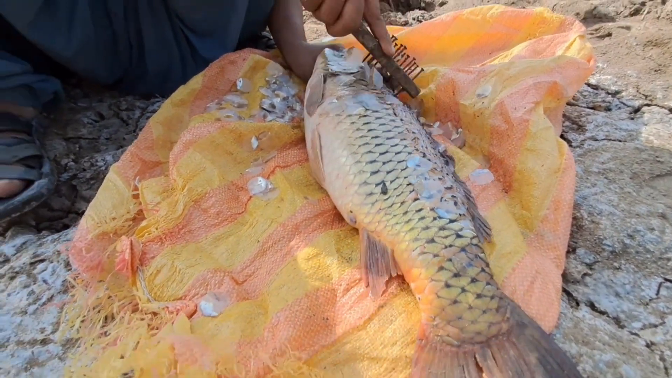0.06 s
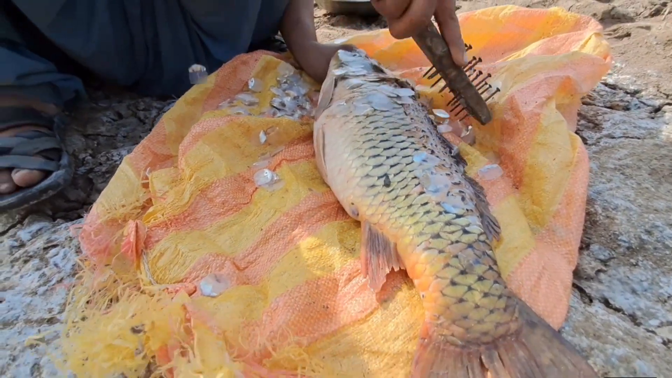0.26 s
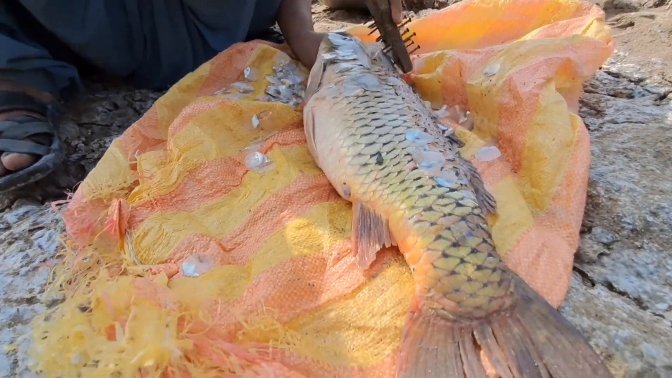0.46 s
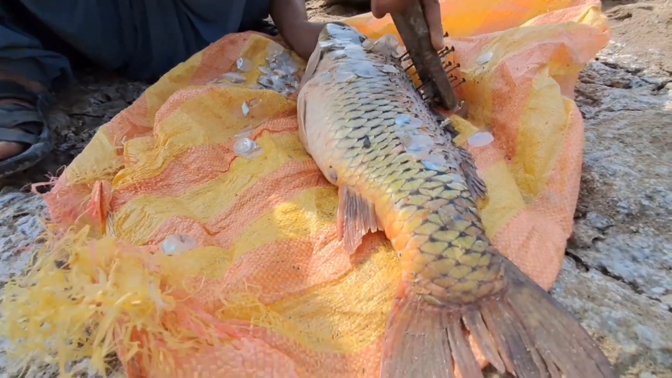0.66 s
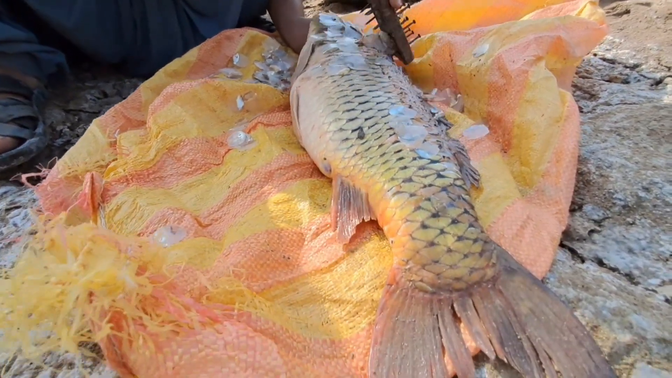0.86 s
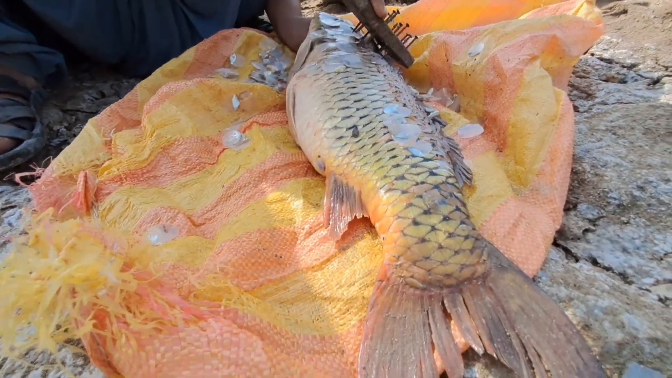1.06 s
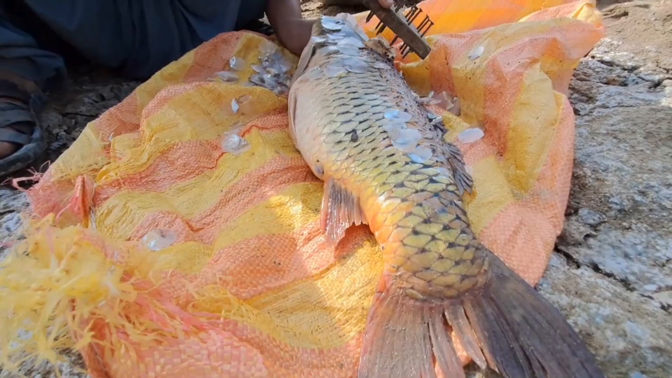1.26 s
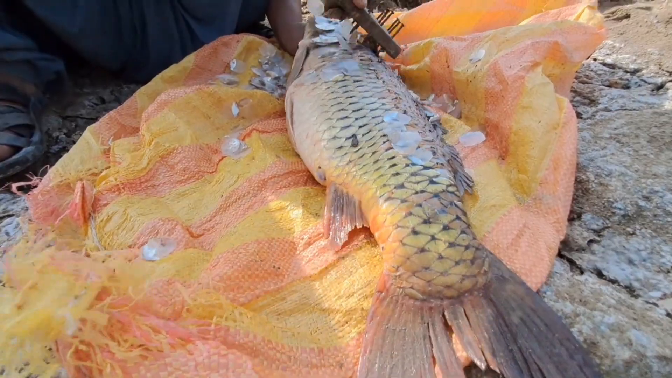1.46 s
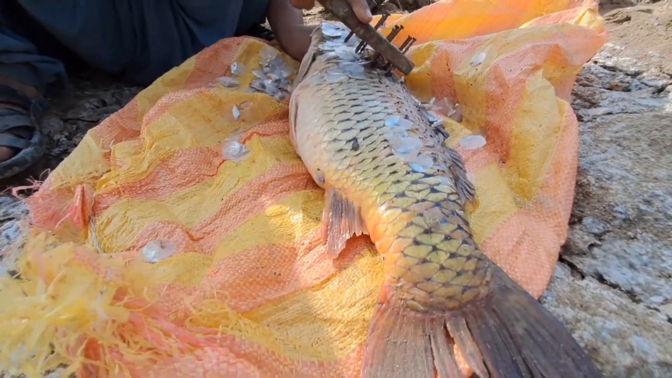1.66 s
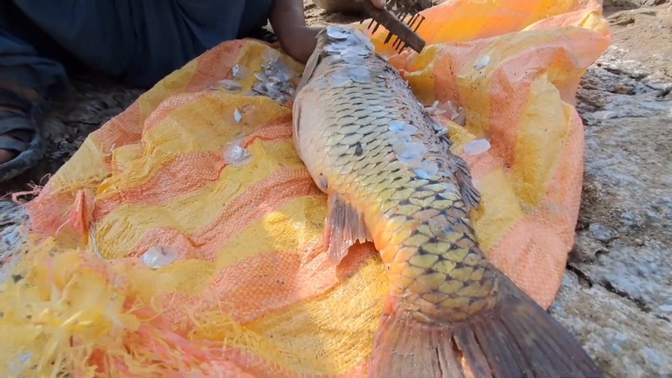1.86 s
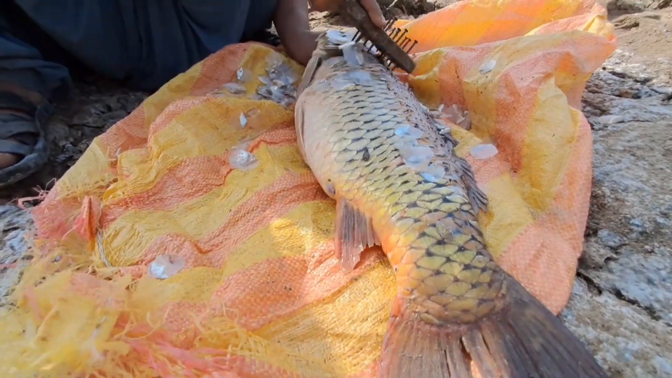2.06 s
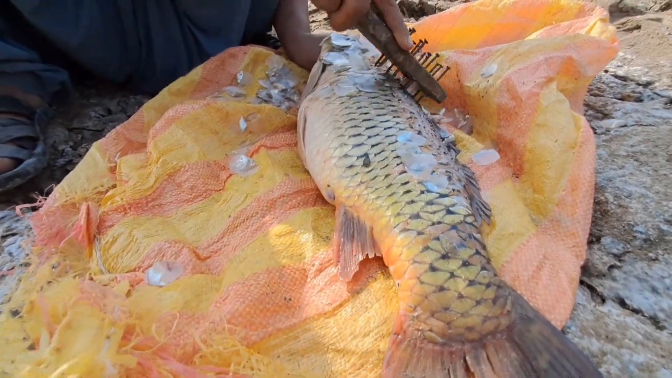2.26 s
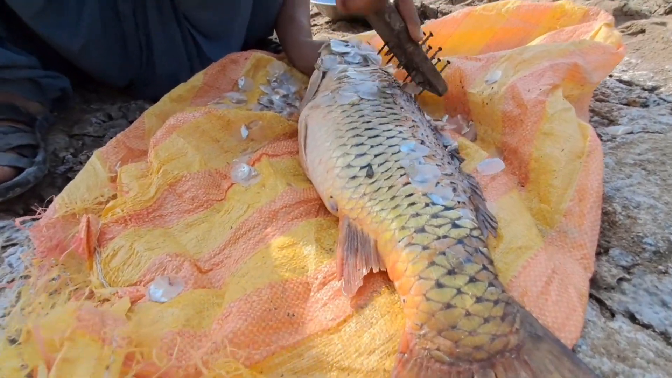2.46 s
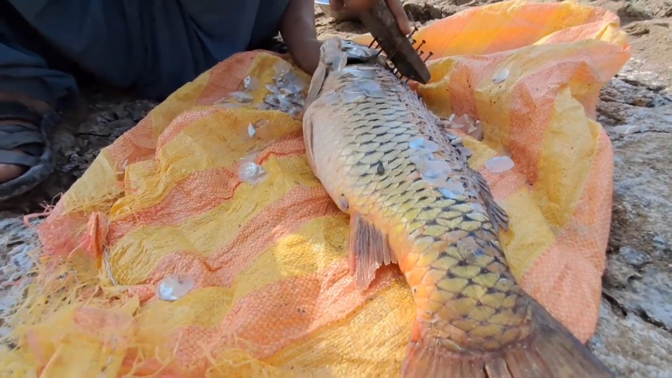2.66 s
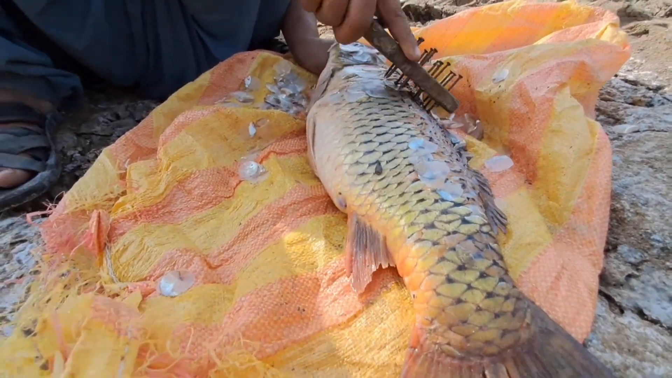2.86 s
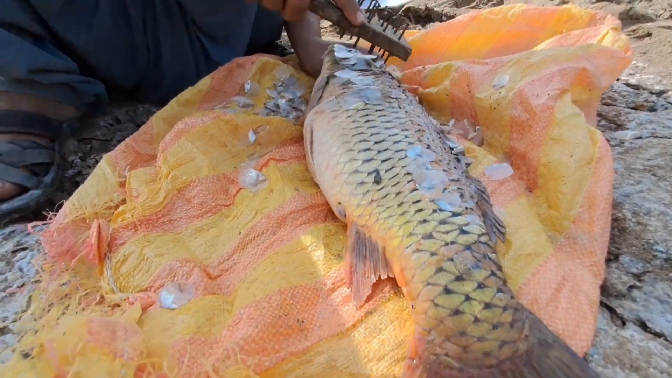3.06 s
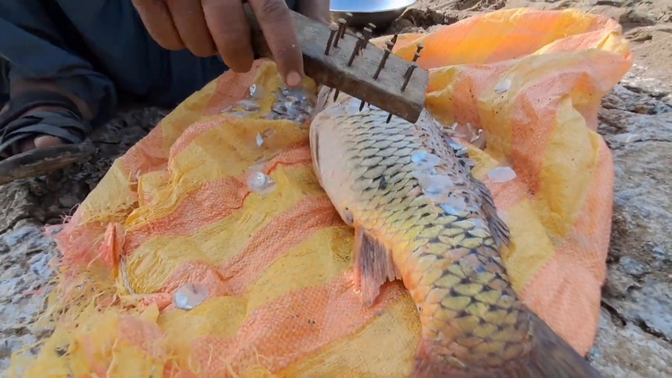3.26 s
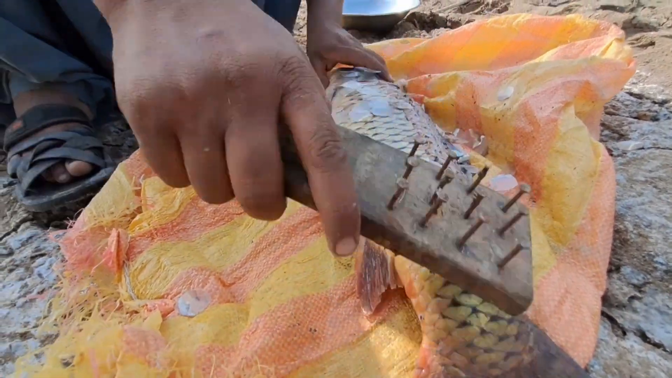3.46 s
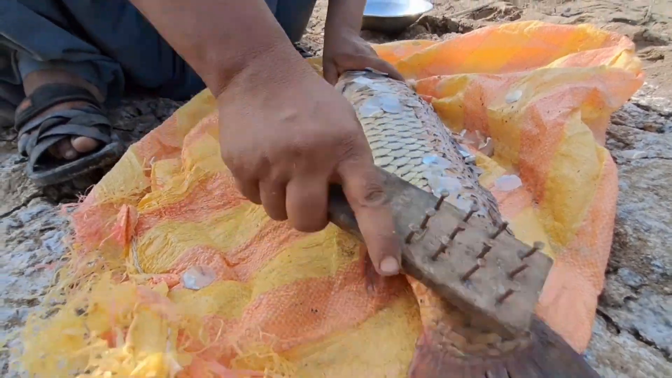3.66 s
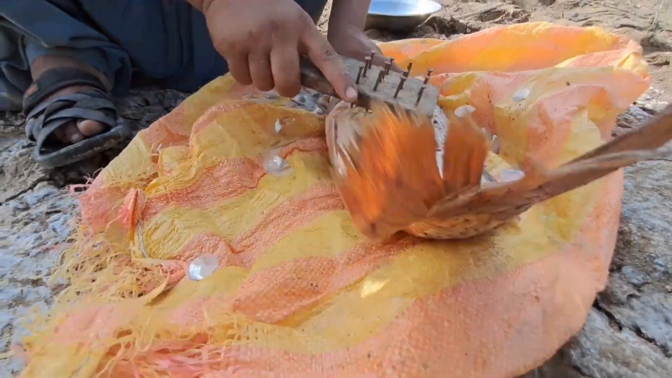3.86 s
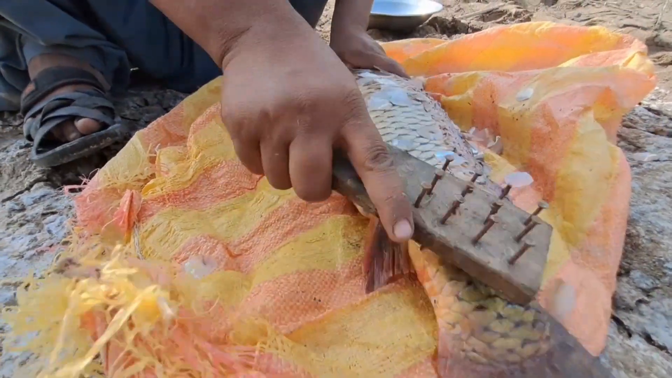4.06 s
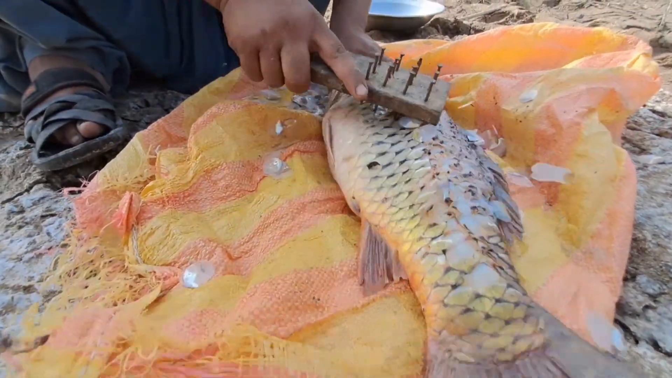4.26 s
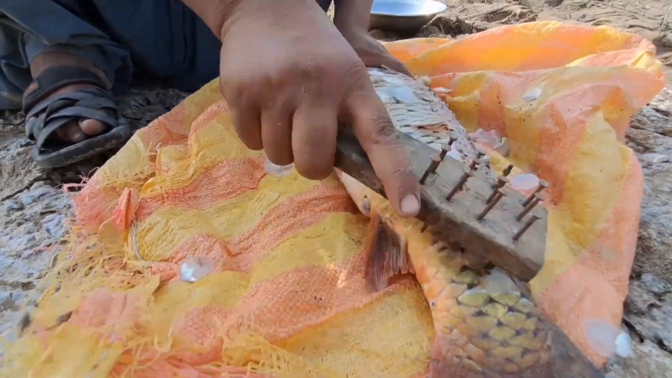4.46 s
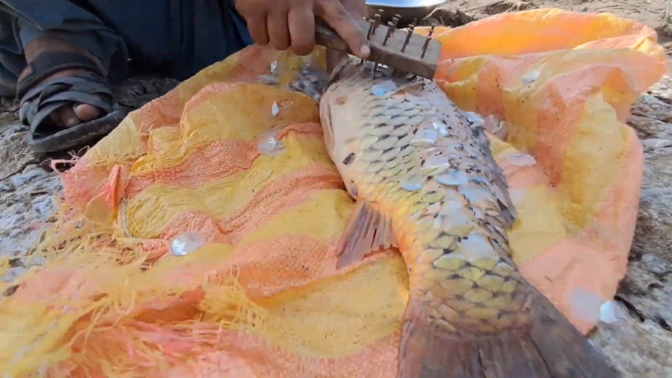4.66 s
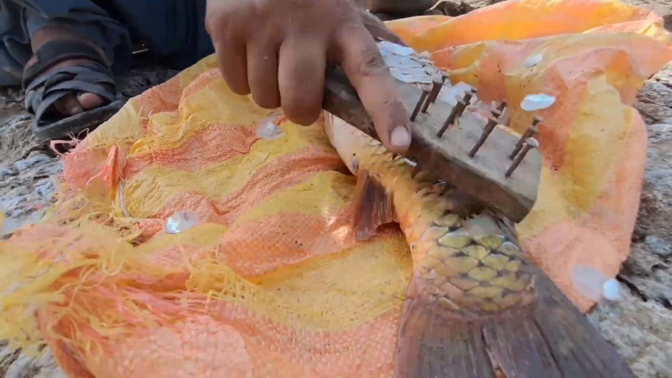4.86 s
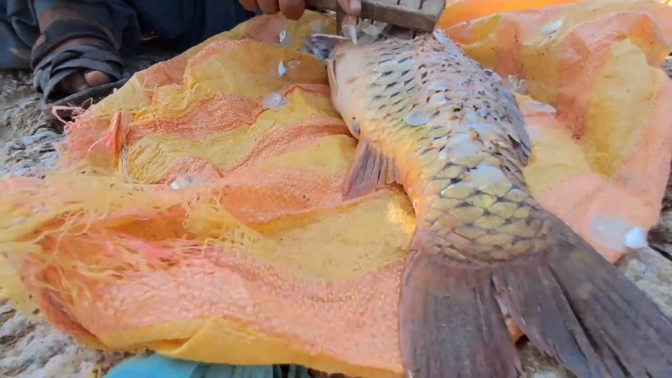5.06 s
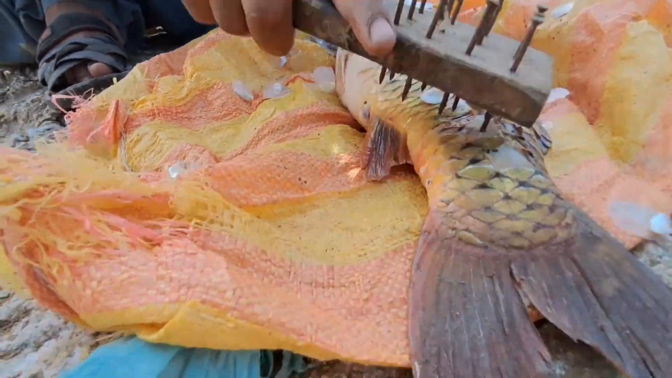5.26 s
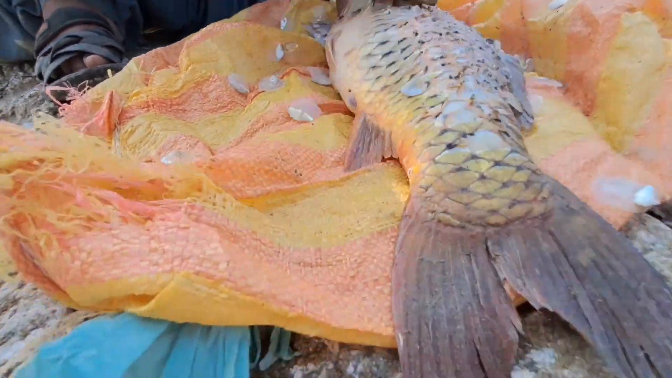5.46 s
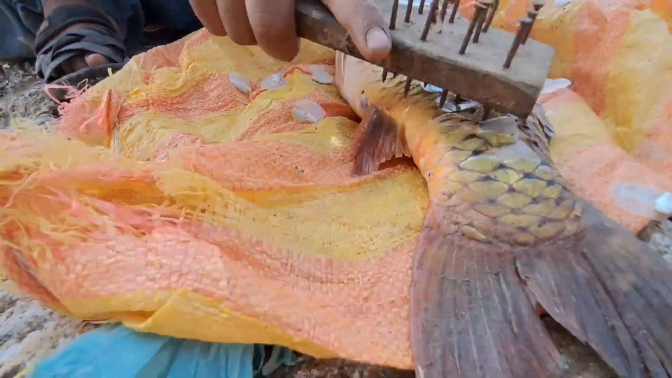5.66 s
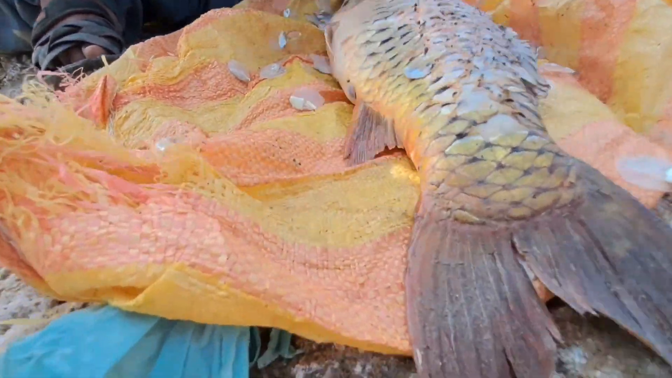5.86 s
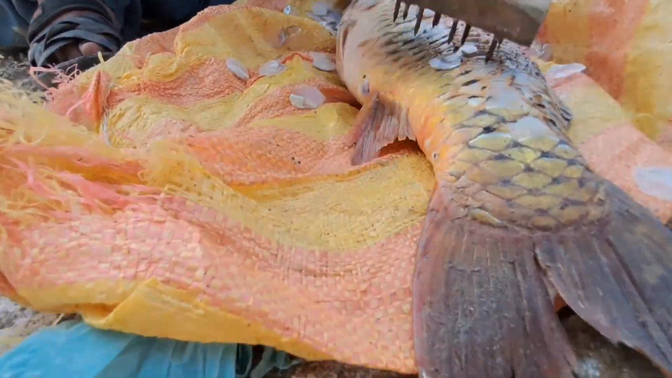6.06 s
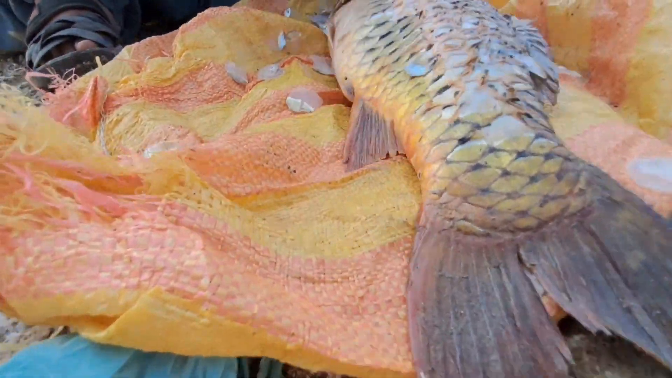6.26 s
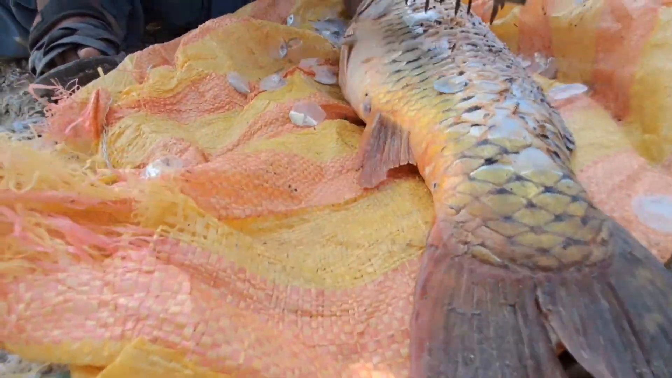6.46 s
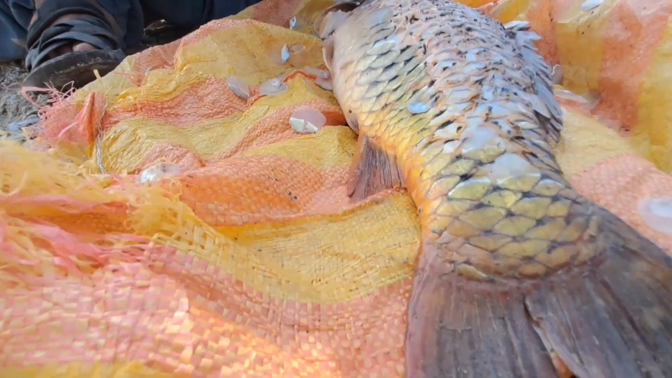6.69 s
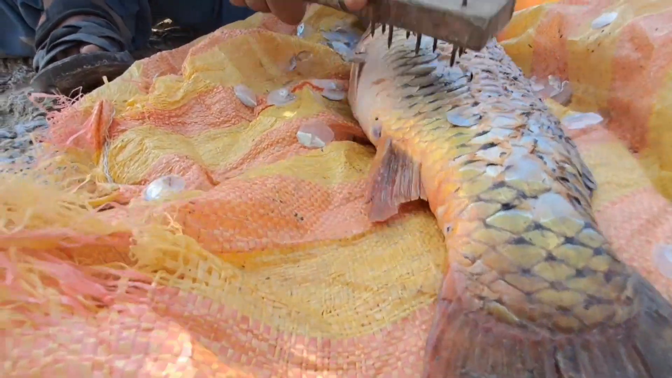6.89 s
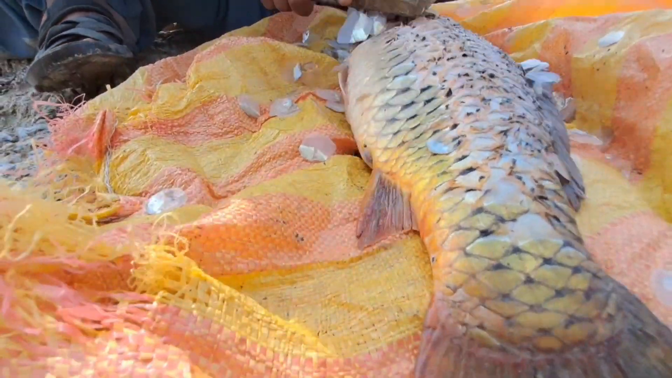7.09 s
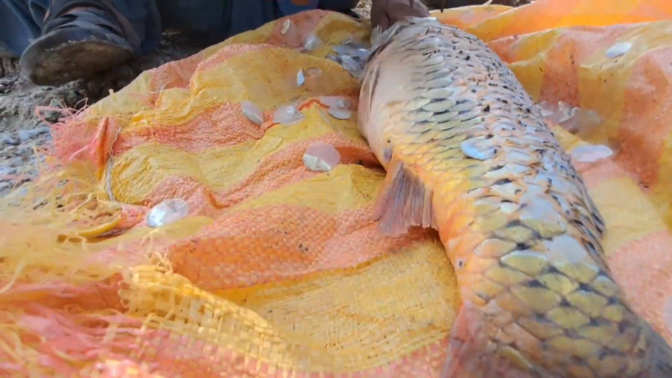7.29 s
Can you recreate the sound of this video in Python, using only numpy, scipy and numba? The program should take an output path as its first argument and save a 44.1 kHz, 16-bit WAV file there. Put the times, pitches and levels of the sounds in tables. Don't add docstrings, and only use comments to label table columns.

```python
import sys
import numpy as np
from scipy import signal
from scipy.fft import rfft, irfft, next_fast_len
from scipy.io import wavfile
from scipy.ndimage import uniform_filter1d
from numba import njit

SR = 44100
rng = np.random.default_rng(int(sys.argv[2]) if len(sys.argv) > 2 else 0)


def master(y):
    cut = np.clip(np.atleast_2d(y).T, -1, 1)
    pcm = np.round(cut * 32767)
    wavfile.write(sys.argv[1], SR, pcm.astype(np.int16))


def volts_from_decibels(level):
    exponent = np.asarray(level, float) / 20
    return 10 ** exponent


N = 323253

# start_s, length_s, hardest_moment (0-1), rasp_db, thud_minus_rasp_db
STROKES = [(-.01, 0.12, 0.7, -20, -7), (0.358, 0.12, 0.21, -21, -9), (0.669, 0.14, 0.6, -25.5, -9),
           (1.022, 0.14, 0.59, -24, -10), (1.368, 0.065, 0.47, -24.5, -9.5), (1.665, 0.094, 0.28, -21, -9),
           (2.009, 0.097, 0.71, -21, -9.5), (2.283, 0.073, 0.64, -28, -10), (2.59, 0.058, 0.82, -26.5, -9),
           (2.886, 0.097, 0.78, -28, -10.5), (3.669, 0.19, 0.28, -18.5, -21),
           (4.111, 0.11, 0.49, -15.5, -14.5), (4.507, 0.15, 0.49, -14.5, -14),
           (4.922, 0.13, 0.46, -14.5, -11.5), (5.315, 0.13, 0.57, -15.5, -13),
           (5.723, 0.12, 0.51, -16.5, -9), (6.126, 0.2, 0.26, -18.5, -6.5), (6.545, 0.15, 0.36, -17.5, -10),
           (6.95, 0.14, 0.63, -14.5, -11.5)]
# start_s, length_s, hardest_moment (0-1), rasp_db, thud_minus_rasp_db
GRAZES = [(0.327, 0.019, 0.37, -37, -4), (0.825, 0.093, 0.2, -42.5, -3), (1.448, 0.12, 0, -39.5, -4),
          (2.67, 0.056, 0.25, -37, -7), (3.617, 0.024, 0.37, -39, -32), (3.967, 0.021, 0.56, -27.5, -2),
          (4.272, 0.032, 0.5, -37, -16), (4.302, 0.037, 0.2, -37.5, -3), (5.635, 0.045, 0.38, -33, -24),
          (5.857, 0.02, 1, -16, -5.5), (6.105, 0.022, 0.95, -30, -16), (6.71, 0.054, 0.1, -36, 1.5),
          (7.102, 0.036, 0.07, -21.5, -7), (7.158, 0.014, .3, -30, -5), (7.178, 0.018, 0.4, -35, -1.5)]
# peak_s, peak_db, ring_hz
SCALE_SNAPS = [(0.006, -10.5, 4300), (0.048, -11, 4760), (0.0567, -15, 4110), (0.064, -8.5, 3600),
               (0.0767, -5.5, 5040), (0.086, -9.5, 3430), (0.0946, -12, 5710), (0.372, -24, 4600),
               (0.3789, -13, 5400), (0.3836, -10, 5260), (0.4461, -6, 5000), (0.477, -26, 3480),
               (0.489, -38, 5700), (0.6866, -14.5, 5360), (0.711, -13.5, 4850), (0.728, -10, 4700),
               (0.744, -18, 5310), (0.781, -19, 4080), (0.7955, -3.5, 6050), (0.849, -23.5, 2700),
               (0.857, -25, 4700), (0.8903, -26.5, 4040), (1.0258, -26, 6400), (1.0418, -27, 4580),
               (1.065, -26, 4660), (1.089, -11, 4430), (1.1099, -30, 4410), (1.118, -24, 4740),
               (1.123, -10, 5200), (1.3928, -20.5, 4730), (1.4307, -22, 3560), (1.4564, -27.5, 7280),
               (1.6762, -21, 6560), (1.682, -25, 4670), (1.6955, -9, 8300), (1.705, -11, 3800),
               (1.7295, -20, 3630), (1.7538, -13, 3640), (2.009, -26, 3480), (2.032, -23.5, 3640),
               (2.0523, -8.5, 3300), (2.069, -20, 4340), (2.0755, -8, 4840), (2.1024, -16.5, 3670),
               (2.2953, -19.5, 4700), (2.3136, -14, 4600), (2.3433, -13, 7950), (2.589, -22.5, 4530),
               (2.598, -14, 6630), (2.6215, -12.5, 4870), (2.6278, -18, 6350), (2.6373, -31, 4570),
               (2.6915, -7, 4240), (2.8941, -20.5, 4530), (2.973, -16, 6220),
               (3.6615, -30, 5120), (3.6875, -16.5, 4340), (3.7073, -11.5, 3940), (3.713, -26, 3400),
                     (3.7268, -3.5, 3060), (3.7373, 1.5, 4750), (3.7401, -4.5, 5090), (3.7569, -1.5, 4500),
                     (3.7675, -7, 4260), (3.7755, -10, 3180), (3.7781, -2, 4630), (3.7869, 0, 5240),
                     (3.7935, -6, 4700), (3.7977, -9.5, 3410), (3.804, -5.5, 4930), (3.815, -19, 4690),
                     (3.8222, -21.5, 3840), (3.8317, -6.5, 3780), (3.9794, -15, 8660), (3.9852, -14, 6640),
                     (3.9993, -28, 5600), (4.0652, -26, 4700), (4.106, -18, 5070), (4.12, -9, 4580),
                     (4.139, -12, 4130), (4.1587, -8.5, 3680), (4.1754, -2.5, 4540), (4.1813, -6, 3450),
                     (4.1975, -10, 4060), (4.2179, 1, 3750), (4.2802, -21, 3150), (4.506, -30, 4280),
                     (4.533, -15, 3200), (4.5406, -11.5, 4050), (4.563, -11, 3390), (4.57, -4.5, 3660),
                     (4.581, -9.5, 3800), (4.5997, -5, 3500), (4.6126, -6, 3550), (4.6183, 7.5, 3470),
                     (4.635, -17, 3730), (4.6552, -35, 4340), (4.9316, -11, 4560), (4.968, -5.5, 3660),
                     (4.973, -3, 2800), (4.979, -12.5, 3930), (4.9898, -17, 4040), (5.0136, -19, 4380),
                     (5.0243, -2, 3120), (5.0349, -4.5, 2650), (5.0487, -13, 5750), (5.0749, -17, 5480),
                     (5.349, -35, 3160), (5.3606, -8, 3710), (5.38, -5, 4200), (5.391, 4.5, 4200),
                     (5.4146, -11.5, 5750), (5.425, -5, 4020), (5.438, -22, 4290), (5.4581, -23, 4970),
               (5.6479, -17, 4570), (5.7381, -26, 4350), (5.7503, -8, 5190), (5.7675, -9, 4030),
                     (5.7786, -5.5, 3450), (5.7835, -8, 5200), (5.8005, -8, 5160), (5.809, -17, 5160),
                     (5.8141, -12, 5270), (5.825, -14, 3170), (5.8285, -17, 4590), (5.851, -24, 4300),
                     (5.8556, -20, 4250), (5.8709, -5, 2530), (5.8755, -7, 3460), (6.0828, -25, 8340),
                     (6.1621, -6, 5430), (6.171, -11, 4490), (6.1838, -3, 5400), (6.1872, -6, 5160),
                     (6.2108, -6, 4030), (6.2253, -11, 3870), (6.2597, -11, 5080), (6.2684, -9, 3980),
                     (6.3007, -9.5, 4010), (6.3055, -9.5, 3610), (6.323, -18, 3980), (6.566, -14, 8250),
                     (6.579, -12, 3460), (6.594, -4, 5020), (6.5997, -22, 3720), (6.6034, -27, 3370),
                     (6.618, -7, 8990), (6.637, -2.5, 5100), (6.6427, -11, 4950), (6.6471, -0.5, 3960),
                     (6.6552, -12.5, 4060), (6.6697, -13, 4440), (6.6834, -17.5, 4300), (6.6863, -27, 4470),
                     (6.7143, -26, 4030), (6.7195, -21, 4400), (6.729, -13.5, 3930), (6.7647, -23, 4120),
                     (6.956, -30, 3100), (6.9839, -9, 4200), (7.006, -6.5, 3950), (7.0098, -10, 8670),
                     (7.0232, -5, 3130), (7.034, -12, 3750), (7.054, -14, 8540), (7.069, -8, 3180),
                     (7.0825, -5, 3990), (7.0855, -10, 4290), (7.1043, -5, 4580), (7.114, -7.5, 3650),
                     (7.1433, -13, 4470), (7.1644, -12, 4470)]
# peak_s, peak_db, ring_hz
LANDINGS = [(0.14, -32, 6000), (0.155, -34, 5200), (0.2313, -42, 2400), (0.3336, -30, 5320),
            (0.511, -28, 3030), (0.5726, -32, 3790), (0.635, -31, 5000), (1.259, -34, 4600),
            (1.2668, -40, 5610), (1.506, -30, 3000), (1.5464, -29, 4400), (2.4605, -35.5, 7400),
            (2.757, -39, 5670), (3.0028, -31, 7390), (3.229, -41, 3890), (3.2391, -39, 3750),
            (3.3626, -37, 7400), (3.628, -29, 3300), (3.6314, -35, 3000), (3.9235, -42, 5120),
            (3.9334, -36, 4960), (4.0389, -42, 3530), (4.0473, -36, 5450), (4.0714, -32, 3790),
            (4.334, -32, 3010), (4.726, -29.5, 7300), (4.842, -38, 7840), (5.2485, -37, 9200),
            (5.4941, -33, 5670), (5.503, -28.5, 4870), (5.6789, -43, 4380), (5.6998, -29, 4540),
            (5.924, -29, 4620), (5.9355, -34.5, 4230), (5.954, -37, 5300), (6.096, -30, 5200),
            (6.407, -41, 7340), (6.4499, -37, 2780), (6.5187, -31, 7660), (6.773, -30, 6210),
            (7.1883, -33, 4830)]
# peak_s, peak_db, pitch_hz
KNOCKS = [(0.0865, -17, 267), (0.371, -28, 585), (0.4465, -28, 427), (0.7809, -26.5, 404),
          (1.058, -29, 187), (1.0914, -15.5, 507), (1.4108, -21.5, 550), (1.7527, -25.5, 620),
          (2.0761, -15.5, 560), (2.1016, -30.5, 527), (2.3487, -28, 234), (2.6406, -20, 633),
          (2.9754, -18.5, 604), (3.736, -21.5, 246), (3.98, -21, 960), (4.2119, -22, 405),
          (4.3223, -26.5, 1010), (4.573, -26.5, 269.4), (4.619, -20.5, 240), (4.6454, -32.5, 238),
          (5.023, -19, 810), (5.0353, -21, 253), (5.38, -26.5, 163), (5.5045, -36, 222),
          (5.7595, -28.5, 416), (5.823, -23, 186), (5.8755, -17.5, 783), (6.153, -25.5, 370),
          (6.1726, -20, 626), (6.267, -33, 194), (6.298, -26, 276), (6.5684, -24, 402), (6.6087, -21, 418),
          (6.6808, -21, 250), (6.7295, -26, 190), (7.0007, -21.5, 515), (7.1132, -19.5, 410),
          (7.163, -33, 300)]
# peak_s, peak_db, pitch_hz, decay_cycles
TWANGS = [(1.411, -29, 1000, 2.5), (2.645, -27, 1050, 2.5), (2.977, -23, 1020, 2.5), (3.634, -31, 3000, 9),
          (3.7286, -2, 3080, 6), (3.864, -33, 4600, 17), (3.984, -27, 1700, 2.5), (4.2815, -26, 3250, 8),
          (4.6, -13, 3500, 9), (5.375, -19, 2050, 5), (5.653, -24, 4600, 12), (5.665, -18, 5000, 11),
          (5.757, -25, 410, 3), (6.166, -25.5, 470, 3), (6.9559, -18, 3100, 12), (7.024, -21, 2050, 3.5),
          (7.086, -19, 2050, 5)]
# start_s, length_s, first_hz, last_hz, level_db
GULPS = [
    (1.37, 0.207, 233.4, 127, -39),
]
# start_s, length_s, swish_db, swish_centre_hz, fibre_hiss_db
RUSTLES = [(0, 0.31, -51.5, 2740, -58), (0.449, 0.17, -51, 2684, -51.5), (0.794, 0.27, -53.5, 2500, -62),
           (1.18, 0.21, -76, 2900, -64), (1.306, .38, -48.5, 2777, -59), (1.826, .07, -51, 2894, -66),
           (2.1, 0.14, -51, 2386, -56.5), (2.369, 0.07, -61, 2710, -51.5), (2.73, 0.1195, -57, 2393, -67),
           (2.975, 0.104, -58.5, 2260, -56), (3.145, 0.11, -73.5, 2286, -54.5),
           (3.221, .2, -52, 2570, -59.5), (3.49, 0.205, -56.5, 2930, -62.5), (3.87, 0.1, -56.5, 2895, -55),
           (3.987, .11, -58.5, 2690, -49.5), (4.24, 0.23, -57, 2667, -59.5), (4.66, 0.072, -59, 2980, -52),
           (5.052, 0.086, -62, 3080, -48), (5.44, 0.21, -62, 2730, -52), (5.691, .06, -64.5, 2760, -44),
           (5.879, 0.068, -53, 2700, -48.5), (5.992, 0.14, -55.5, 1980, -60.5),
           (6.323, 0.14, -61, 2806, -52.5), (6.754, 0.14, -52, 2460, -55.5),
           (7.181, 0.13, -67.5, 3100, -58)]
# start_s, length_s, first_hz, last_hz, level_db
CHIRPS = [(1.785, 0.037, 4600, 4400, -55), (4.8, 0.14, 3950, 4400, -60.5), (6.878, 0.081, 4500, 4900, -50),
          (1.835, .03, 5250, 5450, -62), (2.1, .033, 3800, 5000, -58), (5.08, .04, 2600, 4400, -49.5),
          (5.112, 0.033, 3950, 3450, -55), (7.192, 0.063, 4700, 3650, -59), (6.3, 0.032, 8400, 6600, -39),
          (6.912, 0.067, 2750, 3150, -49)]
# start_s, length_s, first_hz, last_hz, level_db
ARCHED_CHIRPS = [
    (2.497, 0.083, 2680, 3870, -54.5),
    (2.497, 0.067, 3500, 4470, -50),
]
# start_s, length_s, first_hz, last_hz, level_db
COOS = [
    (3.2, .29, 759, 700, -71),
    (6.41, .1, 363, 373, -55),
    (7.23, .12, 344, 352, -58),
    (6.33, .22, 600, 610, -66),
]

# pitch_hz, level_db
SCALE_COLOUR = [(1300, -17.5), (2550, -6), (3050, 0), (4600, -2.5), (6400, -3.5), (9000, -11.5),
                (12300, -6.5), (15800, -14.5)]
# pitch_hz, level_db
FLESH_COLOUR = [(60, -4), (200, -3), (330, -7), (560, -8), (990, -12), (1400, -15), (2050, -3.5),
                (2700, -3)]
# pitch_hz, level_db
RAW_COLOUR = [(500, -2), (16500, 1.5)]
# pitch_hz, level_db
LEAF_COLOUR = [(250, 1), (500, -3.5), (900, -6.5), (1500, -3.5), (2600, -6), (5000, -40.5)]
# pitch_hz, level_db
FIBRE_COLOUR = [(1500, -18), (4500, -1), (9000, -5.5), (12500, -2), (16000, -7)]
# pitch_hz, level_db
BREEZE_COLOUR = [(20, -7), (40, -9), (62, 0.5), (100, -10.5), (160, -15), (260, -24), (450, -49.5),
                 (900, -50)]

PORT_LAG = 10.21
RIGHT_SIDE_DB = 1.0
START_DROP_DB, END_DROP_DB = 16, 10
BITE_DB_PER_S, LIFT_DB_PER_S = 1201, 1289
THUD_GROWTH_DB = 6.5
JERK_DB, JERKS_PER_S = 2.5, 45
SETTLE_DB, SETTLE_DB_PER_S = -38.5, 73
RUSTLE_EDGE_DB, RUSTLE_FADE_DB_PER_S = 5, 315.5
STILL_SWISH_DB, STILL_HISS_DB = -69, -68
BREEZE_DB = -50.5


def strokes():
    rasp_db, thud_db = effort()
    crackle = shower(SCALE_COLOUR, count=40000, cycles=4.5, spread_db=3.3, clump_db=3.0, clump_rate=130)
    edges = slips(count=2400, spread_db=3.4, length_s=0.0003)
    patches = noise(RAW_COLOUR, alike_hz=5140, lag=PORT_LAG, flicker_db=3.5, flicker_rate=35)
    ticks = tint(patches * (edges + 0.98), SCALE_COLOUR)
    flesh = shower(FLESH_COLOUR, count=14000, cycles=1.22, spread_db=1.2, clump_db=1.5, clump_rate=60)
    scrape = (volts_from_decibels(-6.5) * crackle + volts_from_decibels(-7.5) * ticks) * volts_from_decibels(rasp_db)
    return scrape + volts_from_decibels(-2.5) * flesh * (1 + 0.29 * edges) * volts_from_decibels(thud_db)


def effort():
    rasp, thud = [], []
    for start, length, top, db, thud_db in STROKES + GRAZES:
        shape, u = bump(start, length, top, START_DROP_DB, END_DROP_DB, BITE_DB_PER_S, LIFT_DB_PER_S)
        rasp.append(db + shape)
        thud.append(db + shape + thud_db + THUD_GROWTH_DB * (u - .5))
    jerk = JERK_DB * walk(JERKS_PER_S)
    return np.max(rasp, axis=0) + jerk, np.max(thud, axis=0) + jerk


def snaps():
    s, db, hz = np.transpose(SCALE_SNAPS + LANDINGS)
    cycles = 2.88 * np.exp(0.15 * rng.standard_normal(len(s)))
    ring = struck(s, hz, cycles, db - 3.0, lag_spread=1.0, pan_db=-0.7, bite=6.97)
    crack = struck(s, 1.6 * hz, 0.73 + 0 * s, db - 11.0, lag_spread=0.88, pan_db=3.5, bite=5.1)
    tap = struck(s, 0.5 * hz, 0.53 + 0 * s, db - 15, lag_spread=1.0, pan_db=3.5)
    hits = np.zeros(N)
    hits[((s - .0003) * SR).astype(int)] = volts_from_decibels(db)
    tick = volts_from_decibels(-8.0) * puffs(hits, length_s=0.00014)
    tail = volts_from_decibels(-20.0) * puffs(hits, length_s=0.0016)
    return ring + crack + tap + (tick + tail) * noise(SCALE_COLOUR, alike_hz=5700, lag=PORT_LAG)


def knocks():
    s, db, hz = np.transpose(KNOCKS)
    thump = struck(s, hz, 0.86 + 0 * s, db - 2.5, lag_spread=0.94, pan_db=1.0)
    edge = struck(s, 2.06 * hz, 0.5 + 0 * s, db - 7.5, lag_spread=0.86, pan_db=7.0)
    s, db, hz, cycles = np.transpose(TWANGS)
    return thump + edge + struck(s, hz, cycles, db, lag_spread=.4, pan_db=3.0)


def gulps():
    return whistles(GULPS, 15, 0.099, 3.3, 39, wobble=0.072, flutter_db=2.0)


def sack_and_leaves():
    sack_db, sack_hz, hiss_db = rustling()
    folds = 0
    for ratio in (.87, 1.2):
        fold = swish(sack_hz * (ratio + .06 * walk(20)), width_hz=750)
        folds = folds + fold * volts_from_decibels(3.2 * walk(30))
    yard = noise(LEAF_COLOUR, alike_hz=845, flicker_db=-1.0, flicker_rate=3.5)
    air = noise(FIBRE_COLOUR, alike_hz=2500, lag=PORT_LAG, flicker_db=2.5, flicker_rate=18)
    grit = slips(count=300, spread_db=3.1, length_s=0.0007)
    leaves = volts_from_decibels(0.22 * sack_db + 0.63 * hiss_db - 13.0) * yard * (1 + 0.96 * grit)
    fibres = unit(air * (grit + 1.2) * volts_from_decibels(2.0 * walk(30)))
    return volts_from_decibels(sack_db) * unit(folds) + leaves + volts_from_decibels(hiss_db) * fibres


def rustling():
    start, length, db, hz, hiss_db = np.transpose(RUSTLES)[:, :, None]
    shape, _ = bump(start, length, 0.12, RUSTLE_EDGE_DB, RUSTLE_EDGE_DB,
                    RUSTLE_FADE_DB_PER_S, RUSTLE_FADE_DB_PER_S)
    centre = uniform_filter1d(hz[np.argmax(db + shape, axis=0), 0], int(0.013 * SR))
    start, length, _, rasp_db, _ = np.transpose(STROKES)[:, :, None]
    settle, _ = bump(start, length, .5, 0, 0, BITE_DB_PER_S, SETTLE_DB_PER_S)
    hiss = np.maximum((hiss_db + shape).max(axis=0), (rasp_db + SETTLE_DB + settle).max(axis=0))
    return np.maximum((db + shape).max(axis=0), STILL_SWISH_DB), centre, np.maximum(hiss, STILL_HISS_DB)


def birds():
    small = whistles(CHIRPS, 60, .4, 9, 9, wobble=.018, flutter_db=4.5)
    small = small + whistles(ARCHED_CHIRPS, 980, .45, 7, 10, wobble=.008, flutter_db=2.5)
    return np.array([small, np.roll(small, 3)])


def dove():
    return whistles(COOS, 0, .5, 11, 11, wobble=.01, flutter_db=2.0)


def breeze():
    rumble = noise(BREEZE_COLOUR, alike_hz=182, flicker_db=4.0, flicker_rate=22)
    return volts_from_decibels(BREEZE_DB) * rumble * volts_from_decibels(0.76 * walk(19))


def struck(s, hz, cycles, db, lag_spread, pan_db, bite=1.96):
    scatter = rng.standard_normal((len(s), 2))
    rise_s = np.log(bite) / (bite - 1) * cycles / hz
    start = s - rise_s - PORT_LAG / 2 / SR
    return grains(start, hz, cycles, volts_from_decibels(db), scatter, lag_spread, pan_db, bite)


def shower(shape, count, cycles, spread_db, clump_db, clump_rate):
    u, scatter = rng.random((count, 2)), rng.standard_normal((count, 3))
    big = rng.exponential(1, count)
    lo, hi = shape[0][0], shape[-1][0]
    hz = lo * (hi / lo) ** u[:, 1]
    size = volts_from_decibels(spread_db * np.minimum(big, 2.8)) * hz / hi
    out = grains(u[:, 0] * N / SR, hz, cycles * np.exp(.3 * scatter[:, 2]), size, scatter)
    return tint(out * volts_from_decibels(clump_db * walk(clump_rate)), shape)


def grains(s, hz, cycles, size, scatter, lag_spread=2.4, pan_db=3.5, bite=1.73):
    turn = 2 * np.pi * np.clip(hz, 30, .45 * SR) / SR
    fade = turn / (2 * np.pi * cycles)
    shade = np.clip(hz / 3000, 0, 1)
    lag = np.clip(PORT_LAG * (.5 + shade / 2) + lag_spread * scatter[:, 0], 0, 40)
    left = volts_from_decibels((shade + .5) * pan_db * scatter[:, 1] - 2.5 * shade)
    peak = bite ** (-1 / (bite - 1)) * (1 - 1 / bite)
    return rings(np.clip(s, 0, None) * SR, turn, fade, bite, size / peak, lag, left, N)


@njit
def rings(start, turn, fade, bite, size, lag, left, n):
    out = np.zeros((2, n + 4096))
    for g in range(len(start)):
        p, q = np.exp(1j * turn[g] - fade[g]), np.exp(1j * turn[g] - bite * fade[g])
        for c in range(2):
            at = start[g] + (lag[g] if c == 1 else 0.)
            i = int(np.ceil(at))
            a = size[g] * (left[g] if c == 0 else 1.)
            z, w = a * p ** (i - at), a * q ** (i - at)
            for j in range(min(int(6 / fade[g]), 3000)):
                out[c, i + j] += (z - w).imag
                z, w = z * p, w * q
    return out[:, :n]


def slips(count, spread_db, length_s):
    hits = np.zeros(N)
    hits[rng.integers(0, N, count)] = volts_from_decibels(spread_db * np.minimum(rng.exponential(1, count), 3.0))
    return puffs(hits, length_s)


def puffs(hits, length_s):
    fall = np.exp(-1 / (length_s * SR))
    puff = signal.lfilter([1], [1, -2 * fall, fall ** 2], hits) * (1 - fall) * np.e
    return np.array([puff, np.roll(puff, int(PORT_LAG))])


def whistles(calls, arch_hz, top, before_db, after_db, wobble, flutter_db):
    out = np.zeros(N)
    for start, length, first_hz, last_hz, db in calls:
        shape, u = bump(start, length, top, before_db, after_db, 2565, 2500)
        arch = arch_hz * np.minimum(u / 0.26, (1 - u) / (1 - .3))
        hz = first_hz + (last_hz - first_hz) * u + arch
        phase = 2 * np.pi * np.cumsum(hz * (1 + wobble * walk(400))) / SR
        out += volts_from_decibels(db + shape) * np.sqrt(2) * np.sin(phase)
    return out * volts_from_decibels(flutter_db * walk(220))


def swish(hz, width_hz):
    lowpass = signal.butter(3, width_hz / 2, fs=SR, output="sos")
    slow = signal.sosfilt(lowpass, rng.standard_normal((2, 2, N)))
    carrier = np.exp(2j * np.pi * np.cumsum(hz) / SR)
    return unit(((slow[0] + 1j * slow[1]) * carrier).real)


def noise(shape, alike_hz, lag=0., flicker_db=0., flicker_rate=10):
    size = next_fast_len(N)
    hz = np.fft.rfftfreq(size, 1 / SR) + 1e-3
    shared, left, right = rfft(rng.standard_normal((3, size)))
    like = 1 / (1 + (hz / alike_hz) ** 2)
    late = np.exp(-2j * np.pi * hz * lag * (.5 + np.clip(hz / 3000, 0, 1) / 2) / SR)
    pair = np.sqrt(like) * shared * np.array([late ** 0, late])
    pair = pair + np.sqrt(1 - like) * np.array([left, right])
    pair = pair * volts_from_decibels(colour_db(shape, hz))
    octave = np.log2(hz / shape[0][0])
    out = 0
    for k in range(int(np.log2(shape[-1][0] / shape[0][0])) + 2):
        band = np.cos(np.pi / 2 * np.clip(octave - k, -1, 1)) ** 2
        out = out + irfft(pair * band, size)[:, :N] * volts_from_decibels(flicker_db * walk(flicker_rate))
    return unit(out)


def tint(x, shape):
    size = next_fast_len(N)
    gain = volts_from_decibels(colour_db(shape, np.fft.rfftfreq(size, 1 / SR) + 0.0004))
    return unit(irfft(rfft(x, size) * gain, size)[:, :N])


def colour_db(shape, hz):
    rows = np.array(shape)
    return np.interp(np.log(hz), np.log(rows[:, 0]), rows[:, 1], -90, -90)


def bump(start, length, top, before_db, after_db, rise_db_per_s, fall_db_per_s):
    t = np.arange(N) / SR - start
    u, top = np.clip(t / length, 0, 1), np.clip(top, .05, .95)
    arch = np.where(u < top, before_db * (1 - u / top) ** 2, after_db * ((u - top) / (1 - top)) ** 2)
    return -arch + rise_db_per_s * np.minimum(t, 0) - fall_db_per_s * np.maximum(t - length, 0), u


def walk(rate):
    k = int(SR / rate)
    steps = np.repeat(rng.standard_normal(N // k + 1), k)
    w = uniform_filter1d(uniform_filter1d(steps, k), k)[:N]
    return w / w.std()


def unit(x):
    return x / np.sqrt(np.mean(x ** 2))


def ground_smear(near):
    t = np.arange(1500) / SR
    ground = rng.standard_normal((2, len(t))) * np.exp(-np.log(1000) * t / .02)
    bright = np.diff(ground, prepend=0)
    bright = bright / np.sqrt(np.sum(bright ** 2, axis=1, keepdims=True))
    return volts_from_decibels(-13) * signal.fftconvolve(near, bright, axes=1)[:, :N]


def scene():
    near = (strokes() + snaps()) * volts_from_decibels([[-RIGHT_SIDE_DB], [RIGHT_SIDE_DB]]) + knocks()
    return near + ground_smear(near) + gulps() + sack_and_leaves() + birds() + dove() + breeze()


def top_cut(x):
    return signal.sosfilt(signal.butter(12, 16650, fs=SR, output="sos"), x)


def record(dry):
    firm = signal.sosfilt(signal.butter(2, 35, "high", fs=SR, output="sos"), dry)
    rounded = .85 * np.tanh(firm / .85)
    mix = signal.sosfilt(signal.ellip(8, .2, 70, 16200, fs=SR, output="sos"), rounded)
    return top_cut(mix)


dry = scene()
out = record(dry)
master(out)
```